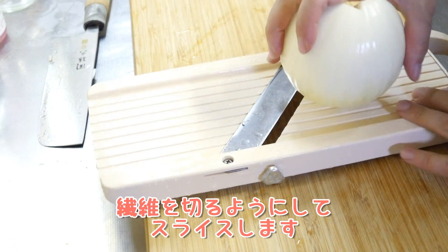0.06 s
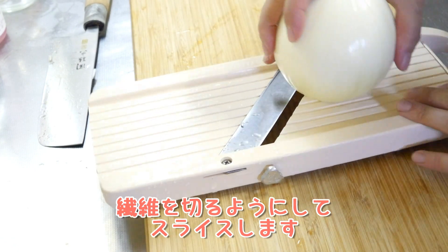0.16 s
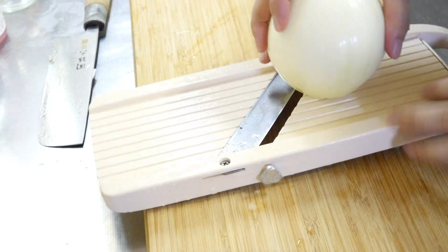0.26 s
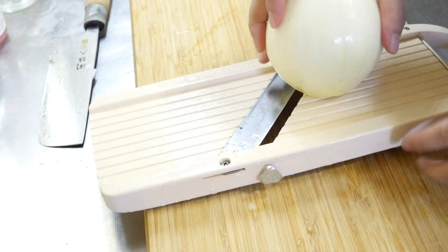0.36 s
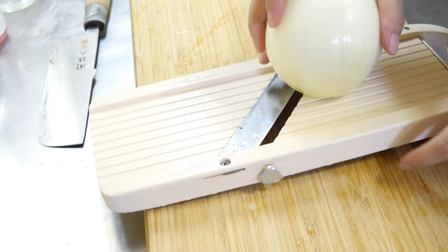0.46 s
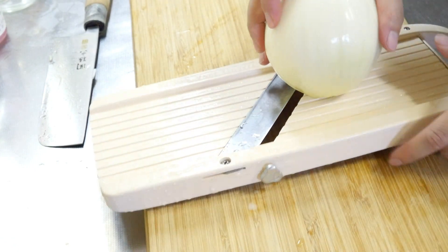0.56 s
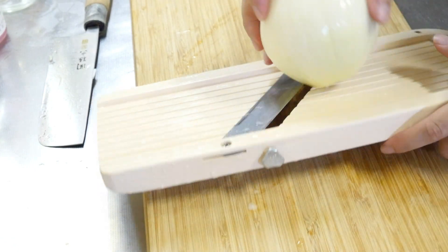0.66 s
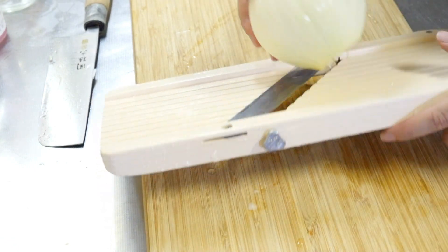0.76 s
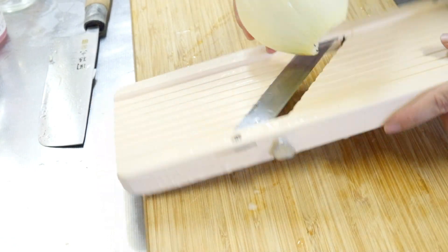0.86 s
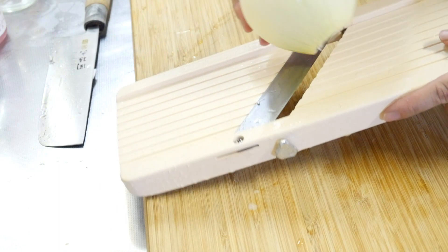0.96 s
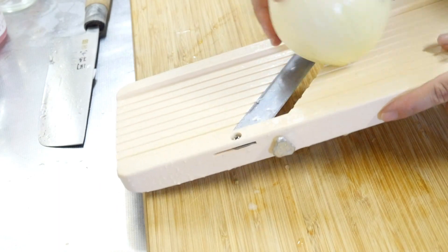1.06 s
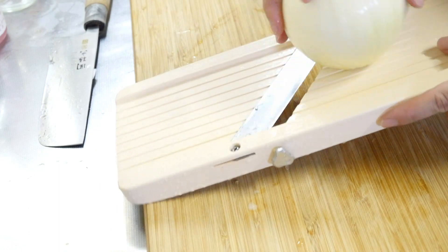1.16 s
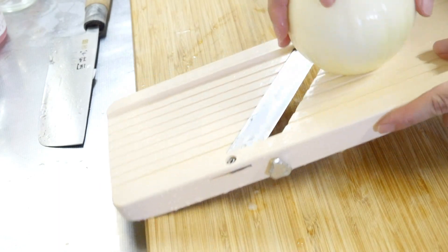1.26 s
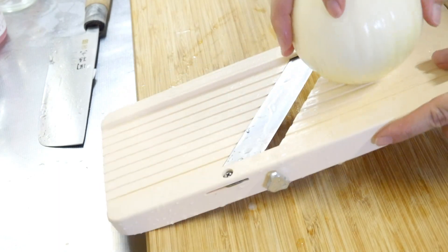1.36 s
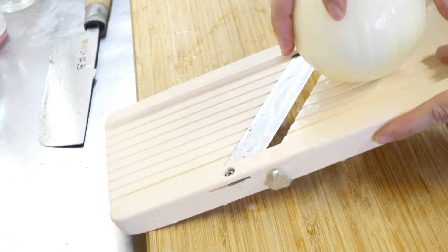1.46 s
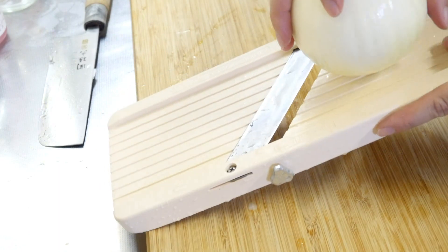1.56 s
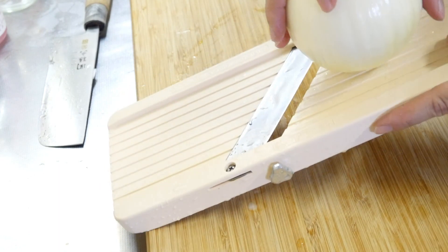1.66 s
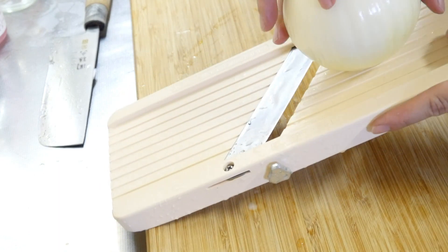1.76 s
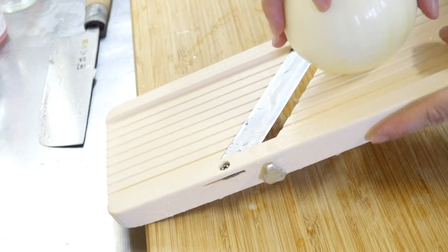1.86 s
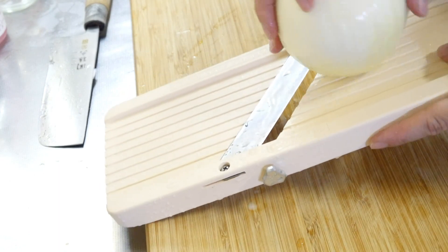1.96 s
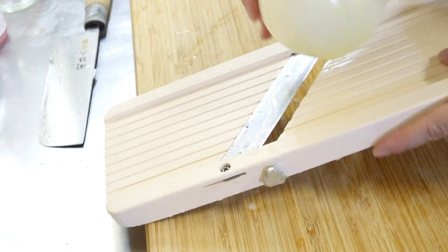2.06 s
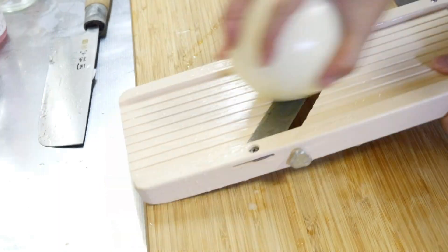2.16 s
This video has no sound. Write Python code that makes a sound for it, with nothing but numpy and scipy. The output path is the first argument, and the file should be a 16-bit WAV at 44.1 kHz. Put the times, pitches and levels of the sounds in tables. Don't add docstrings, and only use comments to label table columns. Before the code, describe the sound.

Hard dull clacks of a handled slicer board on wood, with small ticks and soft onion rasps

```python
import sys
import numpy as np
from scipy import signal
from scipy.fft import rfft, irfft, next_fast_len
from scipy.io import wavfile
from scipy.ndimage import uniform_filter1d, map_coordinates

SR = 44100
rng = np.random.default_rng(int(sys.argv[2]) if len(sys.argv) > 2 else 0)


def waveform_to_disk(signal):
    frames = np.transpose(np.atleast_2d(signal))
    scaled = np.clip(frames, -1, 1) * 32767
    samples = np.round(scaled).astype(np.int16)
    wavfile.write(sys.argv[1], SR, samples)


def natural_amplitude(level_db):
    exponent = np.asarray(level_db, float) / 20
    return 10 ** exponent


N = 97020


def unit(x):
    return x / np.sqrt(np.mean(x ** 2) + 1e-20)


def along(points, hz):
    f, v = np.transpose(points)
    return np.interp(np.log(hz + 1), np.log(f + 1), v)


def filtered(x, response):
    m = 2 * next_fast_len(x.shape[-1])
    spectrum = rfft(x, m) * response(np.fft.rfftfreq(m, 1 / SR))
    return irfft(spectrum, m)[..., :x.shape[-1]]


def causal(points, hz):
    cepstrum = irfft(np.log(natural_amplitude(np.maximum(along(points, hz), -90))))
    half = len(cepstrum) // 2
    cepstrum[1:half] *= 2
    cepstrum[half + 1:] = 0
    return np.exp(rfft(cepstrum))


def resonance(f, centre_hz, width_hz):
    return 1j * f * width_hz / (centre_hz ** 2 - f ** 2 + 1j * f * width_hz)


def ports(mid, side, side_db):
    side = filtered(side, lambda hz: causal(side_db, hz))
    return np.array([mid + side, mid - side])


# frequency in Hz, density in dB per Hz.
HUM_TONE = [(15, -55), (25, -7), (60, -6), (150, -7), (257, -1), (310, -10), (450, -3.5), (1500, -28),
            (1950, -85)]
HISS_TONE = [(710, -10), (1200, 6.5), (1490, 4), (1910, 0), (4240, -8), (10500, -6.5), (15800, -11.5)]
# frequency in Hz, side under mid in dB.
AIR_SIDE = [(60, -13), (110, -21), (200, -20.5), (380, -14), (700, -5), (1290, 1.5), (2380, 1), (4400, -2),
            (8120, -3.5), (15000, -7)]


def air():
    hum_db, hiss_db, patch_db = -61, -72.5, 1.2
    z = signal.stft(rng.standard_normal((2, N)), nperseg=1024)[2]
    field = uniform_filter1d(rng.standard_normal(z.shape[1:]), 5, 0)
    field = uniform_filter1d(field, 5, 1)
    patchy = signal.istft(z * natural_amplitude(patch_db * unit(field)), nperseg=1024)[1][:, :N]
    hum = natural_amplitude(hum_db) * unit(filtered(patchy, lambda hz: natural_amplitude(along(HUM_TONE, hz))))
    white = rng.standard_normal((2, N))
    hiss = natural_amplitude(hiss_db) * unit(filtered(white, lambda hz: natural_amplitude(along(HISS_TONE, hz))))
    return ports(*(hum + hiss), AIR_SIDE)


# frequency in Hz, side under mid in dB.
ROOM_SIDE = [(60, -38), (110, -30), (200, -41.5), (380, -20), (700, -11), (1290, -0.5), (2380, -4.5),
             (4400, -2.5), (8120, -2), (15000, -9)]
# middle in seconds, half length in seconds, fizz in dB, rasp in dB, hollow in dB.
SLIDES = [
    (0.084, 0.14, -76, -100, -100),
    (0.388, 0.11, -72.5, -68, -100),
    (0.93, 0.083, -71, -68.5, -80),
    (1.242, 0.049, -66, -56.5, -70),
    (1.317, 0.028, -64, -55, -65.5),
    (1.366, 0.04, -68, -61.5, -65.5),
    (1.495, 0.13, -81, -74, -93),
    (1.857, 0.083, -77.5, -72.5, -74),
    (2.2, 0.026, -77.5, -72, -83),
]
# frequency in Hz, density in dB per Hz.
SKIN_TONE = [(4500, -37), (7500, -4.5), (10500, 2), (13500, -10), (15500, -19)]
RASP_TONE = [(700, -13.5), (1800, 4.5), (3500, -3.5), (6500, -13), (9000, -30)]


def fits():
    t = np.arange(N) / SR
    return natural_amplitude(4 * map_coordinates(rng.standard_normal(200), [t * 60]))


def slides():
    grains_per_s, grain_db, slot_db, stroke_shape = 11000, 4, -12, 2.5
    t = np.arange(N) / SR
    hit = rng.random((2, N)) < grains_per_s / SR
    size = np.minimum(rng.exponential(size=(2, N)), 3)
    grains = rng.standard_normal((2, N)) * (1 + hit * natural_amplitude(grain_db * size))

    def cavity(centre_hz, width_hz):
        return unit(filtered(grains, lambda f: resonance(f, centre_hz, width_hz) ** 2))

    fizz = unit(filtered(grains, lambda hz: causal(SKIN_TONE, hz)))
    rasp = unit(filtered(grains, lambda hz: causal(RASP_TONE, hz)))
    hollow = cavity(2230, 200) * fits()
    hollow = hollow + natural_amplitude(slot_db) * cavity(2520, 250) * fits()
    out = np.zeros((2, N))
    for middle, half, fizz_db, rasp_db, hollow_db in SLIDES:
        stroke = np.exp(-np.abs((t - middle) / half) ** stroke_shape)
        out += stroke * (natural_amplitude(fizz_db) * fizz + natural_amplitude(rasp_db) * rasp + natural_amplitude(hollow_db) * hollow)
    return ports(*out, ROOM_SIDE)


# times for waves to run about the board, in seconds.
LAPS_S = [.0002, .0005, .0009]


def blow(hard_hz, size=2048):
    scatter, thin = 0.7, 0.2
    f = np.fft.rfftfreq(size, 1 / SR)
    delay_s = np.array(LAPS_S) * np.exp(rng.normal(0, 0.2116, (2, 3)))
    laps = np.exp(-2j * np.pi * f * delay_s[..., None])
    smear = np.prod((scatter + laps) / (1 + scatter * laps), axis=1)
    band = 1j * f / (thin * hard_hz + 1j * f) / (1 + 1j * f / hard_hz) ** 2
    return irfft(smear * band)


# frequency in Hz, time to fall 60 dB in seconds.
ROOM_T60 = [(80, 0.4), (250, 0.48), (1000, .3), (4000, 0.31), (10000, 0.29), (15000, 0.24)]


def room(x):
    delay_s, builds_s = 0.0044, 0.00094
    hz, t, z = signal.stft(rng.standard_normal((2, SR // 2)), SR, nperseg=256)
    decay = natural_amplitude(-60 * t / along(ROOM_T60, hz)[:, None])
    tail = signal.istft(z * decay, SR, nperseg=256)[1]
    tail = tail * (1 - np.exp(-np.arange(tail.shape[1]) / SR / builds_s))
    late = np.pad(x, (round(delay_s * SR), 0))[None]
    return signal.fftconvolve(late, tail / np.linalg.norm(tail[0]), axes=1)[:, :N]


def contacts(rows, tone, body, ring_db, wet_db, left):
    room_db, direct_side_db, room_thins_hz = 2.5, -1, 419
    blows = np.zeros((2, N + SR))
    for s, db, hard_hz in rows:
        one = blow(hard_hz)
        blows[:, round(s * SR):][:, :one.shape[1]] += natural_amplitude(db) * one

    def ring(f):
        modes = sum(natural_amplitude(ring_db + db) * resonance(f, centre, width) for centre, width, db in body)
        return causal(tone, f) * (1 + modes)

    impulse = np.eye(1, 4096)[0]
    near = filtered(blows[:, :N], ring) / np.max(np.abs(filtered(impulse, ring)))
    thinned = filtered(near[0], lambda f: (1j * f / (room_thins_hz + 1j * f)) ** 2)
    far = natural_amplitude(room_db + wet_db) * room(thinned)
    mid = near[0] + far[0]
    side = natural_amplitude(direct_side_db) * near[1] + far[1] + left * mid
    return ports(mid, side, ROOM_SIDE)


# start in seconds, level in dB, hardness in Hz.
LIFT = [(.2305, -44, 3000), (.236, -37, 3040), (.2415, -53, 4000), (.2456, -4, 9500), (.2472, -5.5, 6100),
        (.2505, -15, 4060), (.2545, -13.5, 1500), (.2595, -11, 2500), (.266, -23, 4000), (.274, -16, 3000),
        (.285, -23, 3000), (.2995, -21, 4030), (.302, -12.5, 4540), (.3055, -12, 3400), (.3355, -15, 4770),
        (.340, -18, 1210), (.349, -28.5, 3000)]
# frequency in Hz, density in dB per Hz.
LIFT_TONE = [(40, -17.5), (200, 2.5), (600, -10.5), (2000, -17.5), (2800, -30.5), (4000, -38.5),
             (6000, -46), (15500, -47.5)]
# frequency in Hz, width in Hz, level in dB.
LIFT_BODY = [(172, 12, 13.5), (200.7, 9.5, 9.5), (221.8, 8, 9.5), (269.7, 13, 17), (381, 87, 6),
             (434, 19, -1), (785, 91, 9), (855, 57, 11.5), (1528, 140, 5), (1746, 114, 5), (1940, 41, -6),
             (2110, 180, 6.5), (2730, 550, -4), (3170, 860, -2.5)]


def lift():
    return contacts(LIFT, LIFT_TONE, LIFT_BODY, ring_db=-1.5, wet_db=-7.0, left=0.23)


# start in seconds, level in dB, hardness in Hz.
THUMP = [
    (.27, -35, 200),
    (.68, -44.5, 308),
    (.94, -28, 320),
    (1.205, -25, 186),
]
# frequency in Hz, level in dB.
THUMP_TONE = [(40, -31), (90, -7), (300, -1), (1000, -57.5)]
# frequency in Hz, width in Hz, level in dB.
THUMP_BODY = [(93.2, 8.8, 6), (135, 41, -3.5)]


def thump():
    return contacts(THUMP, THUMP_TONE, THUMP_BODY, ring_db=13.5, wet_db=14.5, left=0)


# start in seconds, level in dB, hardness in Hz.
TAP = [
    (.5188, -24.5, 20000),
    (.5215, -23.5, 8000),
    (.524, -27.5, 5200),
    (.5275, -27.5, 5000),
    (.533, -27.5, 14500),
    (.537, -34, 2980),
    (.542, -28.5, 1470),
    (.551, -35, 1510),
]
# frequency in Hz, density in dB per Hz.
TAP_TONE = [(59, -77), (100, 19), (429, 8), (3390, -16.5), (9950, -16.5), (15500, -40.5)]
# frequency in Hz, width in Hz, level in dB.
TAP_BODY = [(175, 44, -3), (399, 22, 4.5), (884, 90, -1), (996, 100, -1.5), (1590, 100, -12),
            (1930, 430, -8.5), (4620, 130, -3), (6700, 400, -3), (10300, 3500, 0)]


def tap():
    return contacts(TAP, TAP_TONE, TAP_BODY, ring_db=4.5, wet_db=-8.0, left=-0.082)


# start in seconds, level in dB, hardness in Hz.
TICK = [
    (.6505, -32.5, 25400),
    (.6525, -43, 15000),
    (.655, -61, 15000),
    (.659, -58, 15000),
    (.6635, -38, 15000),
    (.666, -41, 12000),
]
# frequency in Hz, density in dB per Hz.
TICK_TONE = [(300, -120), (1500, 15), (4000, -3), (6000, 2.5), (11000, 2), (15500, -16)]
# frequency in Hz, width in Hz, level in dB.
TICK_BODY = [(3980, 470, 9), (10500, 2100, -4.5), (13500, 890, 14)]


def tick():
    return contacts(TICK, TICK_TONE, TICK_BODY, ring_db=1.5, wet_db=-5, left=-0.15)


# start in seconds, level in dB, hardness in Hz.
NUDGE = [
    (.752, -25, 20100),
    (.7555, -36, 5000),
    (.759, -41, 4000),
    (.809, -46, 4000),
    (.813, -60, 4000),
    (.82, -42, 5000),
    (.858, -44, 8000),
]
# frequency in Hz, density in dB per Hz.
NUDGE_TONE = [(180, -75), (300, 17.5), (892, 5), (1970, -10.5), (2280, -13.5), (10600, -22), (15500, -32)]
# frequency in Hz, width in Hz, level in dB.
NUDGE_BODY = [(918, 34, 7), (1080, 20, 4.5), (1700, 130, 0), (1990, 120, 7), (2360, 600, 5.5),
              (6650, 350, -9)]


def nudge():
    return contacts(NUDGE, NUDGE_TONE, NUDGE_BODY, ring_db=1.5, wet_db=-6, left=-0.1)


# start in seconds, level in dB, hardness in Hz.
SETDOWN = [(.926, -31, 5000), (.9298, -7.5, 5040), (.9322, -1.5, 7260), (.9337, -10.5, 20800),
           (.9375, -7, 6000), (.9415, -18, 4950), (.9465, -8.5, 21200), (.951, -10, 3930),
           (.954, -6.5, 15000), (.958, -37, 25000), (.963, -10.5, 5070), (.969, -18.5, 4000),
           (.981, -24, 3000)]
# frequency in Hz, density in dB per Hz.
SETDOWN_TONE = [(40, -47), (200, 15.5), (800, 1.5), (4000, -12.5), (9500, -28), (15500, -36.5)]
# frequency in Hz, width in Hz, level in dB.
SETDOWN_BODY = [(226, 23, 2), (279, 6.9, -9), (366, 42, 1.5), (793, 210, -2), (1098, 87, 6),
                (1540, 100, -4), (1923, 87, 5), (2830, 980, 1), (3930, 120, 5.5), (4220, 97, 2.5),
                (5450, 47, 3.5), (6700, 570, 3.5), (9780, 1540, 15.5), (11260, 1160, 13.5)]


def setdown():
    return contacts(SETDOWN, SETDOWN_TONE, SETDOWN_BODY, ring_db=4.0, wet_db=-7.5, left=-0.021)


# start in seconds, level in dB, hardness in Hz.
FLICK = [
    (1.1338, -39, 20000),
]
# frequency in Hz, density in dB per Hz.
FLICK_TONE = [(2500, -40), (4600, -8), (6000, -4), (9000, -13), (15500, -15)]


def flick():
    return contacts(FLICK, FLICK_TONE, [], ring_db=0, wet_db=-4.0, left=-0.15)


# start in seconds, level in dB, hardness in Hz.
KNOCK = [(1.1892, -15, 13800), (1.1908, -11, 6600), (1.1925, -15, 5000), (1.197, -17, 2200),
         (1.2015, -24, 1740), (1.209, -19.5, 1160), (1.2185, -18, 1980), (1.225, -46, 2970),
         (1.266, -30.5, 2000), (1.279, -37, 2500)]
# frequency in Hz, density in dB per Hz.
KNOCK_TONE = [(40, -37), (200, 4.5), (1100, -12.5), (2300, -23.5), (15500, -48)]
# frequency in Hz, width in Hz, level in dB.
KNOCK_BODY = [(170, 8.4, 2), (214, 36, 8), (273.4, 8.7, 7), (368, 27, 0.5), (406, 40, 8.5), (690, 140, 1),
              (763, 42, 2.5), (1043, 39, 9), (1130, 163, 8), (1390, 53, -3), (1710, 86, 2.5),
              (2173, 134, 7.5), (2800, 180, -9)]


def knock():
    return contacts(KNOCK, KNOCK_TONE, KNOCK_BODY, ring_db=3, wet_db=-6.5, left=-0.0025)


def scene():
    handling = lift() + thump() + tap() + tick() + nudge()
    landing = setdown() + flick() + knock()
    return air() + slides() + handling + landing


def top_cut(x):
    return signal.sosfilt(signal.butter(12, 16480, fs=SR, output="sos"), x)


def record(dry):
    low_hz, top_hz, dip_hz, dip_width_hz, dip = 62, 15600, 7800, 200, 0.5

    def microphone(f):
        bass_cut = (1j * f / (low_hz + 1j * f)) ** 2
        notch = 1 - dip * np.exp(-((f - dip_hz) / dip_width_hz) ** 2)
        return bass_cut * notch / (1 + (f / top_hz) ** 60)

    return top_cut(filtered(dry, microphone))


dry = scene()
out = record(dry)
waveform_to_disk(out)
```